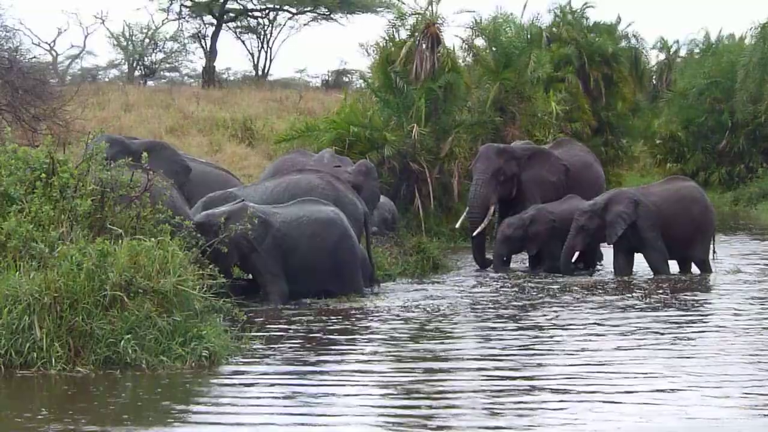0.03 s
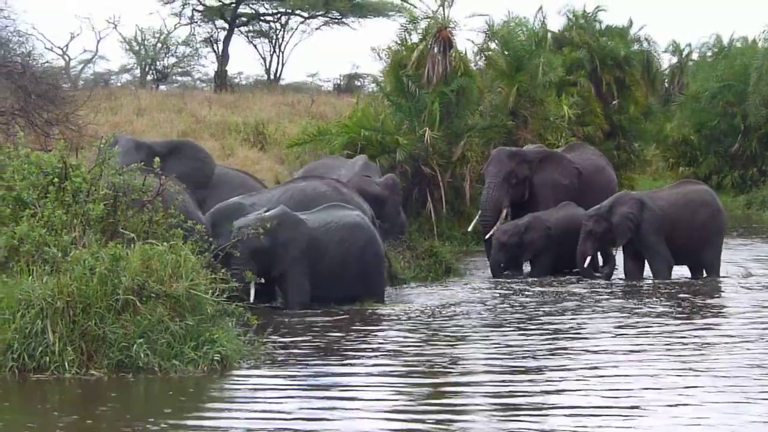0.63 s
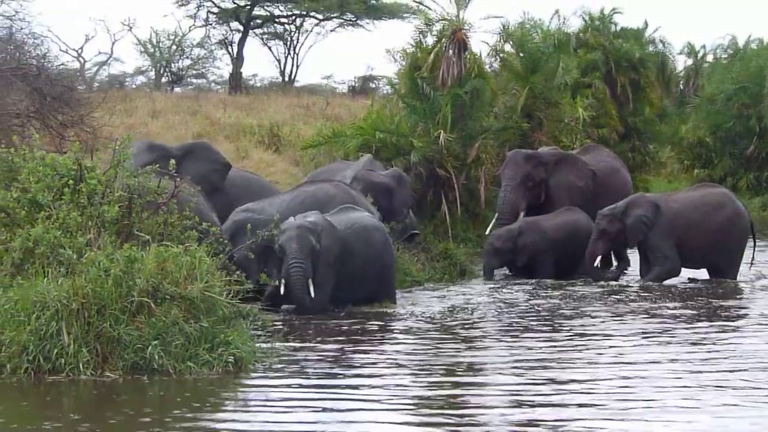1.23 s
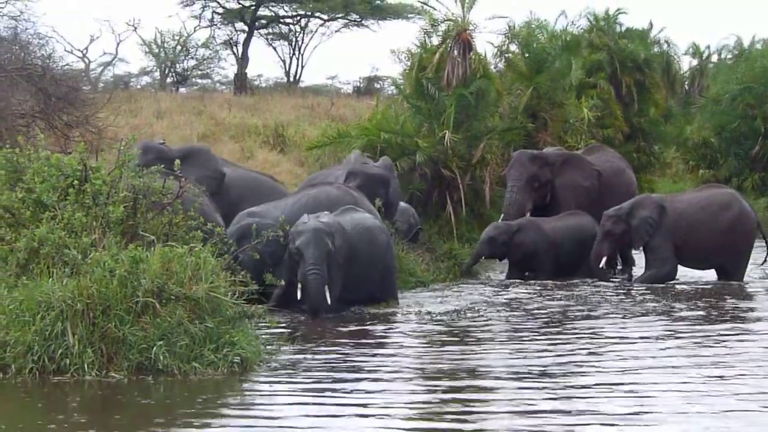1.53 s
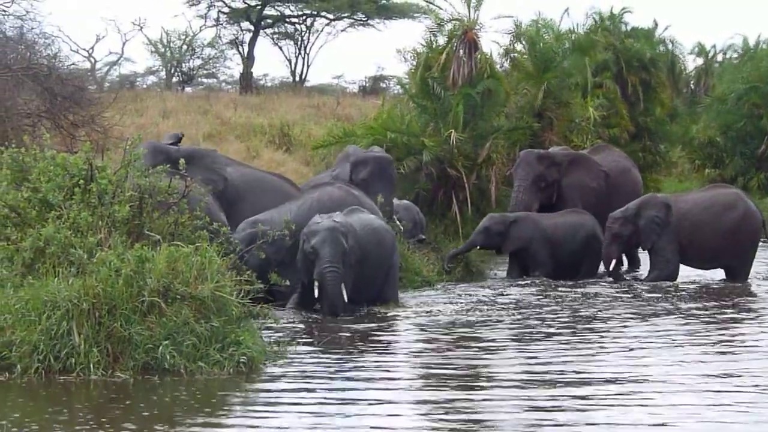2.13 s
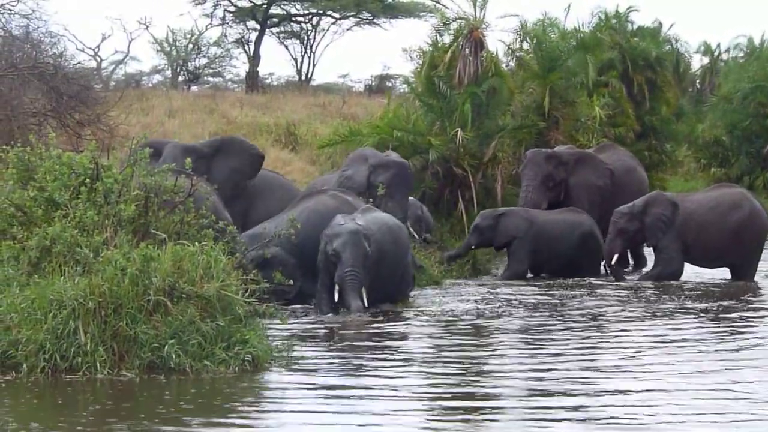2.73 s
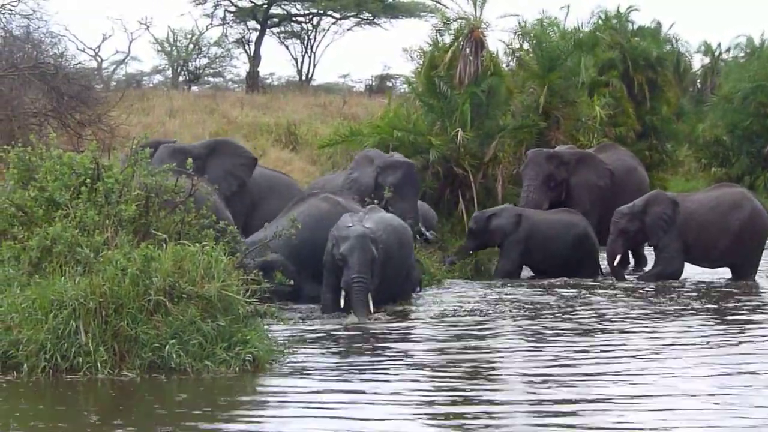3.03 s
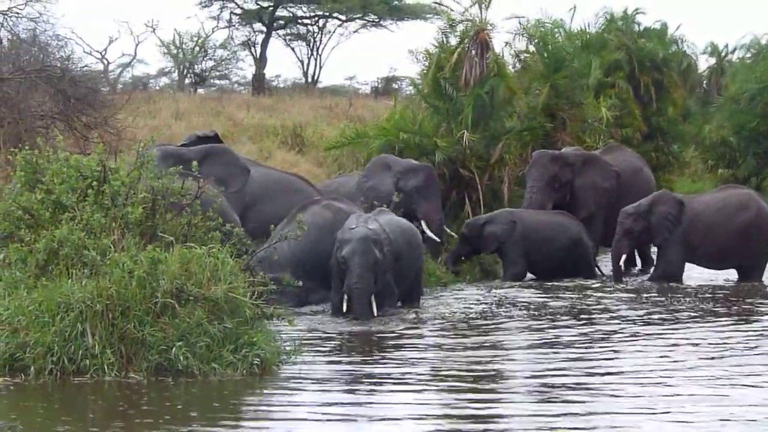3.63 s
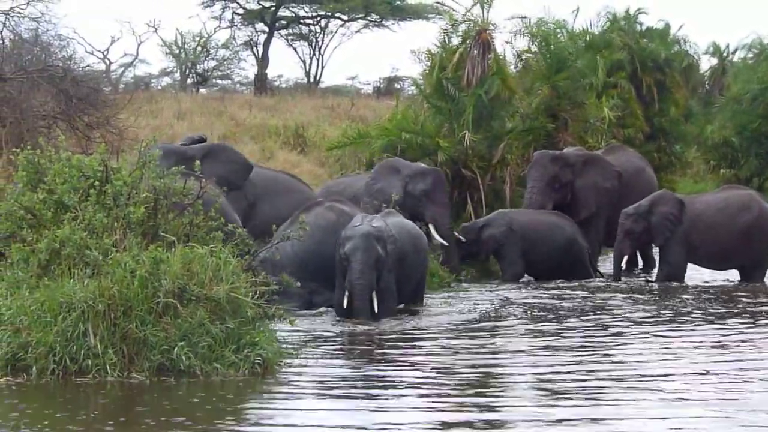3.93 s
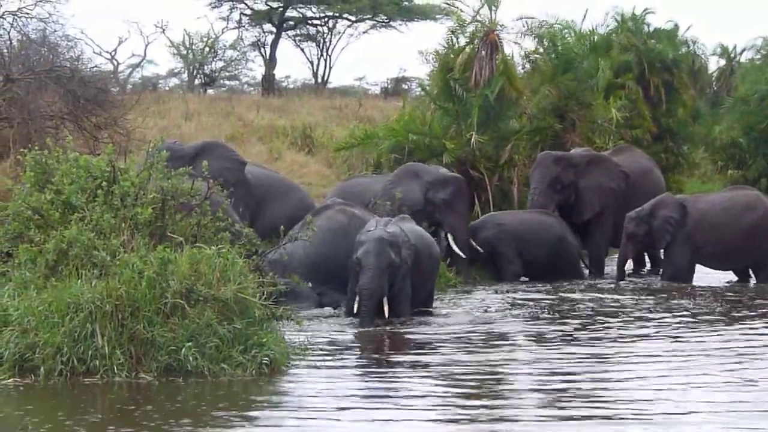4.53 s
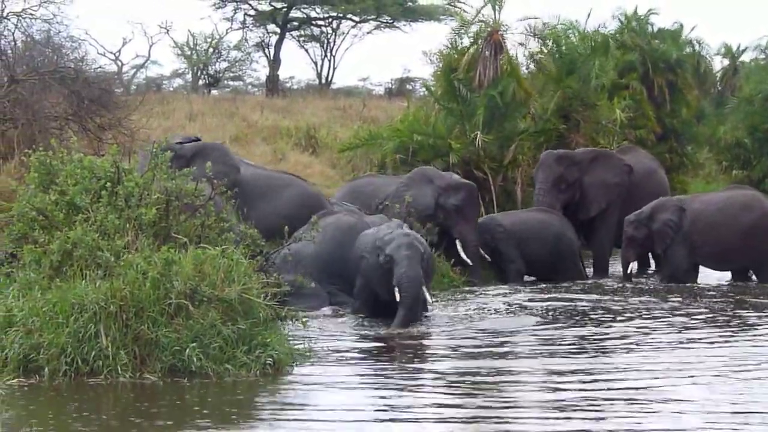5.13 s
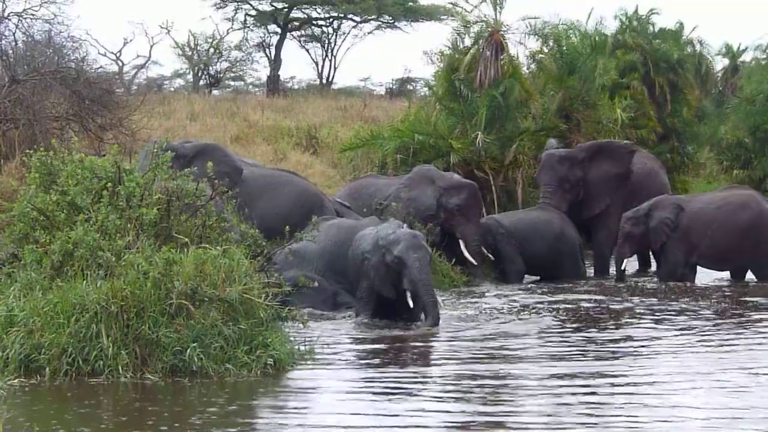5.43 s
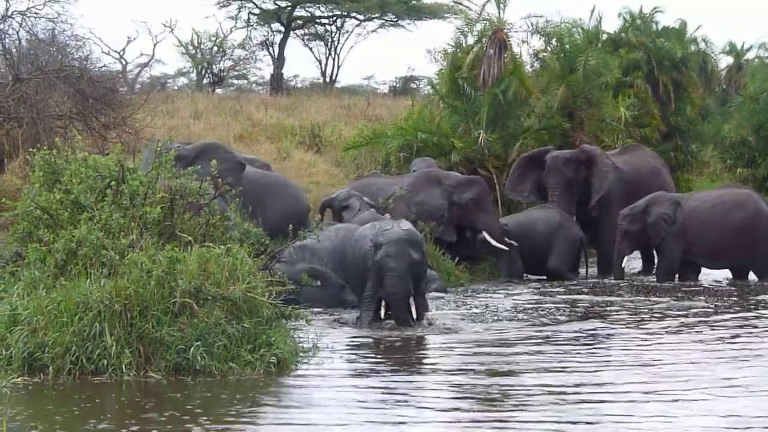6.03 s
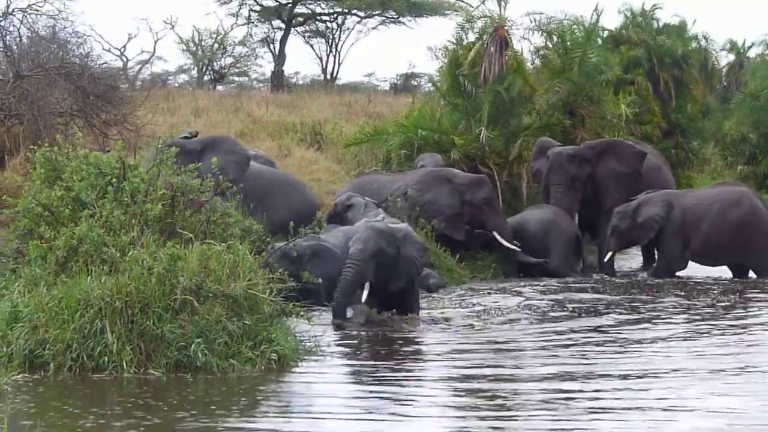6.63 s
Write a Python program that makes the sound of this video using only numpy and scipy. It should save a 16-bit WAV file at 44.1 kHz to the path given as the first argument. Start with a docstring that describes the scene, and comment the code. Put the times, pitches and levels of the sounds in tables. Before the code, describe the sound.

Low wind gusts thump the microphone over a steady river rush, faint splashing from wading elephants and one thin bird whistle.

```python
"""Elephants wading in a river

Some way off, elephants stir up bubbles that slosh and plop, and throw spray that spatters.
Water and windblown leaves make a steady rush, and a small bird gives one thin, high whistle.
Gusts buffet the microphone's two openings (ports); a gain control ducks the sound after hard ones."""
import sys
import numpy as np
from scipy import signal
from scipy.fft import rfft, irfft
from scipy.io import wavfile
from scipy.ndimage import uniform_filter1d

SR = 44100
rng = np.random.default_rng(int(sys.argv[2]) if len(sys.argv) > 2 else 0)


def persist_wave(psi):
    """Save psi, clipped to +-1, as 16-bit WAV."""
    counts = np.round(np.clip(psi, -1, 1) * 32767).astype(np.int16)
    wavfile.write(sys.argv[1], SR, np.atleast_2d(counts).T)


N = 303408
T = np.arange(N) / SR
BINS = np.fft.rfftfreq(N, 1 / SR)

# Levels in the tables are relative: the functions set the final loudness.
# tone colour of the rush of water and leaves: f/Hz, level/dB
RUSH_SPECTRUM = [(20, -38), (45, -8.5), (90, -9.5), (125, -7), (230, -4), (400, 1), (650, -1), (790, -4),
                 (1100, -7), (1400, -6.5), (2300, -8.5), (3200, -11), (5500, -12.5), (6900, -16),
                 (7500, -28.5), (8000, -63.5)]
# humps and hollows in that colour: f/Hz, width/Hz, change/dB
RUSH_HUMPS = [(115, 18, 11), (423, 45, -1), (475, 24, -2.5), (603, 100, 3), (870, 55, -1), (1016, 188, 5.5),
              (2577, 170, 4.5), (2670, 350, -4)]
# how alike the rush is at the two ports: f/Hz, likeness/0-1
RUSH_LIKENESS = [(40, 0.94), (130, 0.99), (300, 1), (650, 0.98), (1050, 1), (1400, 0.59), (1900, 0.56),
                 (2700, 0.22), (3400, .15), (4500, 0.34), (6500, 0.67), (8000, 0.63)]
# how much louder it is on the left: f/Hz, difference/dB
RUSH_LEFT_BOOST = [(60, 1), (230, 0), (400, 1.5), (560, 0.5), (870, 3), (1360, 5.5), (2200, 5.5),
                   (3300, 2.5), (5200, 4), (7800, -3)]
# how far its waves are ahead on the left: f/Hz, phase/rad
RUSH_LEFT_LEAD = [(100, .03), (600, 0.083), (1000, 0.43), (2000, 0.9), (2800, 1.3), (4200, 0.58),
                  (6500, 0.83), (8000, .2)]
# the breeze in the leaves swells and slackens: t/s, half length/s, change/dB
BREEZE_SWELLS = [(0.135, 0.19, 2.5), (0.999, 0.48, -1.5), (1.55, 0.15, 0.9), (2.6, 0.1, 1),
                 (3.417, 0.72, -1.4), (4.216, 0.15, 1.5), (4.798, 0.98, 0.06), (6.537, 0.044, 0.8)]
# rumble of wind on the microphone: f/Hz, level/dB
RUMBLE_SPECTRUM = [(15, -42.5), (30, -15.5), (55, -2.5), (110, 2.5), (180, 0.5), (250, -4.5), (350, -11),
                   (480, -18), (700, -26.5), (1100, -41.5), (2500, -54.5), (6000, -73)]
# a small, fast eddy (a whirl of air) sounds higher: f/Hz, level/dB
SHARP_SPECTRUM = [(30, -20), (130, 0), (290, -0.5), (480, -6.5), (700, -11), (1100, -25.5), (2500, -54.5),
                  (6000, -72)]
# gusts on the microphone: start/s, length/s, level/dB
WIND_GUSTS = [(0.281, 0.08, -28.5), (0.444, 0.16, -29.5), (0.726, 0.11, -26), (0.849, 0.21, -25),
              (1.028, 0.06, -27.5), (1.364, 0.13, -41), (1.825, 0.19, -30.5), (2.12, 0.09, -26.5),
              (2.252, 0.11, -28), (2.668, .1, -34.5), (2.83, 0.075, -20), (2.945, 0.17, -26.5),
              (3.142, 0.12, -35), (3.43, 0.28, -40.5), (6.036, 0.12, -31.5), (6.23, 0.07, -31.5),
              (6.335, 0.035, -33.5), (6.536, 0.054, -31.5), (6.755, .2, -29)]
# the hardest eddies: t/s, level/dB, half length/s, sharpness/0-1
EDDIES = [(.277, -27.5, 0.014, 0.06), (0.343, -19, 0.017, 0.1), (0.377, -18.5, .008, 0.07),
          (0.447, -13, 0.008, .1), (0.473, -15, .011, 0.4), (0.524, -15.5, 0.013, .4),
          (.567, -16, 0.0097, 0.08), (0.743, -18.5, 0.0066, .15), (0.785, -18.5, .009, 0),
          (0.848, -13, 0.01, 0.35), (0.868, -17, .006, 0.4), (.921, -14.5, 0.011, .15),
          (0.975, -16.5, .006, 0.8), (1.009, -16, 0.025, 1), (1.857, -35, .01, 0.2),
          (1.922, -24.5, 0.012, 0.2), (1.983, -23, 0.0068, .3), (2.028, -25.5, 0.0085, .3),
          (2.094, -19, 0.0058, 0), (2.136, -19, 0.012, 0.7), (2.167, -14.5, 0.012, 0.6),
          (2.21, -21.5, .008, .5), (2.26, -18.5, 0.016, 0.4), (2.322, -18.5, .011, 0.5),
          (2.389, -24.5, 0.011, .1), (2.63, -27.5, 0.0071, .5), (2.809, -22, 0.0061, 0),
          (2.825, -14, 0.0064, .05), (2.901, -23, .01, 0.1), (2.922, -13.5, 0.0071, 0),
          (2.948, -17, 0.0076, 0.07), (2.962, -22.5, 0.0081, .1), (2.996, -18, 0.0087, .15),
          (3.043, -16.5, 0.008, 0.5), (3.113, -26, 0.0071, 0), (3.194, -32.5, .006, 0.4),
          (3.444, -25, .008, 0.3), (3.585, -25.5, 0.0091, 0), (5.478, -31.5, 0.013, .5),
          (5.702, -31, 0.02, 0.6), (6.024, -19, 0.01, 0), (6.1, -24, 0.0081, 1), (6.143, -23, .007, .3),
          (6.261, -20, .017, 0.1), (6.298, -22.5, .008, 0.1), (6.346, -25.5, .008, .1),
          (6.397, -27, .008, 0.1), (6.516, -19, 0.0065, 0.2), (6.534, -19.5, .006, 0.6),
          (6.567, -20.5, .008, .2), (6.755, -16, 0.014, .3), (6.776, -22.5, .009, .3),
          (6.874, -16.5, 0.031, 1)]
# whirls of air that hit the ports head on: t/s, level/dB, f/Hz
WIND_THUMPS = [(.327, -6.5, 200), (.8465, -3, 180), (2.1525, -3, 260), (2.319, -10, 230), (6.738, -11, 130)]
# the larger spatters of spray: t/s, level/dB, half length/s, f/Hz
SPRAY_BURSTS = [(0.09, -34, .003, 5000), (.128, -34, .003, 5000), (.192, -31, .004, 5800),
                (0.247, -32, .009, 2500), (.286, -26.5, 0.0034, 2530), (1.523, -29.5, 0.0054, 4500),
                (1.642, -32, 0.0026, 3050), (1.838, -32, .004, 2320), (3.124, -31.5, 0.0021, 4900),
                (3.198, -29.5, 0.0022, 2410), (4.174, -32, 0.0027, 5000), (5.486, -31, .003, 4650),
                (6.007, -34, .003, 2570), (6.42, -36, .004, 2500), (6.427, -28, .002, 2800),
                (6.462, -31.5, 0.0066, 6000), (6.61, -32, 0.0027, 4700), (6.6296, -23, 0.0013, 4200)]
# water closes over feet and trunks: t/s, level/dB, f/Hz
AIR_POCKETS = [(.183, -17, 558), (.247, -16.5, 683), (1.161, -19.5, 1160), (1.252, -20, 1134),
               (1.474, -19, 940), (2.08, -22, 1290), (2.418, -15.5, 880), (2.67, -18.5, 1090),
               (3.817, -19.5, 800), (3.991, -18.5, 426), (4.038, -17.5, 590), (4.39, -18.5, 431),
               (4.476, -20, 610), (4.563, -21, 830), (4.912, -19, 934), (4.916, -19, 620),
               (5.42, -20.5, 432), (5.532, -20, 614), (5.6, -23, 573), (5.892, -17, 431),
               (6.018, -17.5, 705), (6.261, -14, 666), (6.583, -16.5, 1000)]
# legs and trunks stir the water: t/s, half length/s, level/dB, f/Hz
STIRRINGS = [(.01, 0.037, -26, 850), (0.25, 0.066, -33, 1100), (.642, 0.047, -36, 850),
             (1.164, 0.077, -36, 1100), (2.004, .08, -34, 750), (2.4, 0.042, -35, 800),
             (3.07, 0.028, -26, 650), (3.83, 0.035, -32, 750), (4.205, 0.052, -32, 1290),
             (4.648, 0.14, -43, 1200), (4.983, .08, -35.5, 1200), (5.303, .06, -33, 900),
             (5.6, 0.094, -39, 850), (6.014, .035, -32, 900), (6.265, .05, -36, 850),
             (6.52, 0.074, -43, 1100)]


def gain_of(db):
    """Turns decibels into a factor to multiply a sound by."""
    return 10 ** (np.asarray(db) / 20)


def evened(x):
    """Scales a signal to an average strength (rms) of 1."""
    return x / np.sqrt(np.mean(x ** 2) + 1e-20)


def read(points, hz):
    """Reads between the points of a curve, with octaves evenly spaced."""
    f, value = np.transpose(points)
    return np.interp(np.log(hz + 1), np.log(f + 1), value)


def coloured(x, points):
    """Filters a sound by a curve of points: f/Hz, level/dB."""
    return irfft(rfft(x) * gain_of(read(points, BINS)), N)


def smoothed(x, seconds):
    """A bell-shaped running average."""
    offset = np.arange(-4000, 4001) / SR
    window = np.exp(-.5 * (offset / seconds) ** 2)
    return signal.fftconvolve(x, window / window.sum(), "same")


def wander(rate_hz):
    """A random drift of strength 1, mostly slower than the rate."""
    return evened(irfft(rfft(rng.standard_normal(N)) * np.exp(-(BINS / rate_hz) ** 2), N))


def bell(s, half):
    """A smooth rise and fall of height 1 around time s."""
    return np.exp(-np.minimum(((T - s) / half) ** 2, 60))


def add(mix, s, sound):
    """Mixes a sound in at time s."""
    part = mix[max(round(s * SR), 0):][:len(sound)]
    part += sound[:len(part)]


def breeze(steady_db=2.5):
    """The changing strength of the breeze in the leaves, in dB."""
    return steady_db + sum(db * bell(s, half) for s, half, db in BREEZE_SWELLS)


def rush(level_db=-29.5, patch_db=0.92, flicker_db=1.36, leaves_from_hz=700):
    """Far water and leaves: noise with drifting louder patches, whose treble follows the breeze."""
    frames, hz = N // 256 + 5, np.fft.rfftfreq(1024, 1 / SR)  # a grid of moments and pitches
    t = np.arange(frames) * 256 / SR
    a, b, c, d, patches = rng.standard_normal((5, frames, len(hz)))
    common, separate = a + 1j * b, c + 1j * d
    patches = uniform_filter1d(patches, size=7, axis=0)  # blur over time
    patches = evened(uniform_filter1d(patches, size=14, axis=1))  # and over pitch
    likeness = np.clip(read(RUSH_LIKENESS, hz), 0, 1)
    lag = np.exp(-1j * read(RUSH_LEFT_LEAD, hz))
    left = common * gain_of(read(RUSH_LEFT_BOOST, hz))
    right = (likeness * common + np.sqrt(1 - likeness ** 2) * separate) * lag
    ports = np.array([left, right]) / np.sqrt(np.mean(abs(left + right) ** 2, axis=0))
    leaves = hz ** 2 / (hz ** 2 + leaves_from_hz ** 2)
    breeze_db = np.interp(t, T, breeze() + flicker_db * wander(rate_hz=200))
    ports = ports * gain_of(patch_db * patches + breeze_db[:, None] * leaves)
    noise = signal.istft(ports.swapaxes(1, 2), nperseg=1024, noverlap=768)[1][:, :N]  # grid to sound
    humps_db = sum(db / (1 + (2 * (BINS - f) / width) ** 2) for f, width, db in RUSH_HUMPS)
    noise = irfft(rfft(noise) * gain_of(read(RUSH_SPECTRUM, BINS) + humps_db), N)
    return gain_of(level_db) * noise / noise.mean(0).std()


def bubble(hz, ring_s, rise=0.0095):
    """A pocket of air rings briefly, its pitch rising as it nears the surface."""
    t = np.arange(0, 7 * ring_s, 1 / SR)
    age = t / ring_s
    return 2 * age * np.exp(-age) * np.sin(2 * np.pi * hz * t * (1 + rise * (age / 2 - 1)))


def ripples(level_db=-42, per_s=400, spread_db=8.5, cycles=1.97, right_db=-4, count=28):
    """Many small bubbles and droplets patter inside the rush."""
    out = np.zeros((2, N))
    for hz in np.geomspace(500, 6500, count):
        strength = gain_of(spread_db * np.minimum(rng.exponential(1, N), 4))
        starts = rng.random(N) < per_s / count / SR
        drops = signal.oaconvolve(strength * starts, bubble(hz, cycles / hz))[:N]
        delay = rng.integers(-2, 6)  # each pitch reaches the right port at its own time
        out += [drops, gain_of(right_db) * np.roll(drops, delay)]
    return gain_of(level_db) * evened(coloured(out, [(6800, -3), (8000, -28)]))


def bird(start_s=5.35, length_s=0.325, hz=8720, sag_hz=150, waver_hz=48, level_db=-34.5, fade_db=-10):
    """One arched, quivering whistle; it flutters because it takes many paths through the trees."""
    from_middle = np.clip(2 * (T - start_s) / length_s - 1, -2, 2)
    droop = from_middle ** 4
    pitch = hz - sag_hz * np.minimum(droop, 1) + waver_hz * wander(rate_hz=94)
    whistle = gain_of(level_db + fade_db * droop) * np.sin(2 * np.pi * np.cumsum(pitch) / SR)
    delays_s = 0.02 * rng.exponential(1, (2, 40))  # 40 paths to each port
    ports = np.array([sum(np.roll(whistle, round(s * SR)) for s in paths) for paths in delays_s])
    return ports * whistle.std() / ports.std(axis=1, keepdims=True)


def turbulence(spectrum):
    """Churning air: rumbling noise of nearly even strength."""
    noise = evened(coloured(rng.standard_normal(N), spectrum))
    return noise / np.sqrt(smoothed(noise ** 2, seconds=0.007) + .03)


def swirl(spectrum, shared, crossing_s=0.00055):
    """Churning air at both ports: the shared part reaches the left one first."""
    common, left, right = (turbulence(spectrum) for _ in range(3))
    both = np.array([common, np.interp(T - crossing_s, T, common)])
    return np.sqrt(shared) * both + np.sqrt(1 - shared) * np.array([left, right])


def gusts(rise_s=0.035, fall_s=0.037, stir_db=-11.5, stir_s=0.12):
    """Each gust arrives quickly, holds and dies away, with weakly stirred air around it."""
    power = np.zeros(N)
    for start, length, db in WIND_GUSTS:
        early, late = np.maximum(start - T, 0), np.maximum(T - start - length, 0)
        blast = np.exp(-early / rise_s - late / fall_s)
        stir = gain_of(stir_db) * np.exp(-(early + late) / stir_s)
        power = np.maximum(power, gain_of(db) ** 2 * (blast ** 2 + stir ** 2))
    return np.sqrt(power)


def wind(steady_db=1.5, lumpy_db=4, flutter_db=3.5, limit_db=4, left_db=2.2, right_db=1):
    """Gusts and single eddies push on the microphone; sharp eddies sound higher."""
    unrest_db = np.array([lumpy_db * wander(rate_hz=30) + flutter_db * wander(rate_hz=74)
                          for _ in range(2)])
    unrest_db = limit_db * np.tanh(unrest_db / limit_db)
    low_power = (gusts() * gain_of(steady_db + unrest_db)) ** 2
    high_power = np.zeros(N)
    for s, db, half, sharpness in EDDIES:
        power = gain_of(db) ** 2 * bell(s, half)
        low_power += power * (1 - sharpness)
        high_power += power * sharpness
    rumble = np.sqrt(low_power) * swirl(RUMBLE_SPECTRUM, shared=0.2)
    buffets = np.sqrt(high_power) * swirl(SHARP_SPECTRUM, shared=0.77)
    left, right = rumble + buffets
    sheltered = coloured(right, [(30, 7), (100, -2), (300, -3), (900, -2)])  # duller out of the wind
    return np.array([gain_of(left_db) * left, gain_of(right_db) * sheltered])


def thumps(half_cycles=0.56, left_db=1, right_db=-4, crossing_s=0.0005):
    """A whirl of air hits head on: one or two quick swings of pressure, the left port first."""
    t = np.arange(-1024, 1024) / SR
    out = np.zeros(N)
    for (s, db, hz), turn in zip(WIND_THUMPS, rng.random(len(WIND_THUMPS))):
        swing = np.exp(-(t * hz / half_cycles) ** 2) * np.sin(2 * np.pi * (hz * t + turn))
        add(out, s + t[0], gain_of(db) * swing)
    delayed = np.interp(T - crossing_s, T, out)
    return np.array([gain_of(left_db) * out, gain_of(right_db) * delayed])


def spatter(half, hz, octaves=0.39):
    """A splash of fine drops: a short hiss around one pitch."""
    t = np.arange(-2048, 2048) / SR
    bins = np.fft.rfftfreq(len(t), 1 / SR)
    colour = np.exp(-.5 * (np.log2((bins + 1) / hz) / octaves) ** 2)
    shape = 1 / (1 + (t / half) ** 2)
    burst = irfft(rfft(shape * rng.standard_normal(len(t))) * colour)
    return evened(burst) * np.sqrt(np.mean(shape ** 2))


def spray(gain_db=0.5, right_db=-4, stray_db=-35, stray_half_s=0.0019, low_hz=2000, high_hz=5500):
    """Thrown spray lands in short crisp bursts, stray drops in faint ticks at random."""
    strays = [(when * N / SR, stray_db, stray_half_s, low_hz * (high_hz / low_hz) ** height)
              for when, height in rng.random((18, 2))]
    out = np.zeros(N)
    for s, db, half, hz in SPRAY_BURSTS + strays:
        burst = spatter(half, hz)
        add(out, s - len(burst) / 2 / SR, gain_of(db) * burst)
    out = coloured(out, [(6300, 0), (7200, -14.5), (8000, -42)])
    return gain_of(gain_db) * np.array([out, gain_of(right_db) * np.roll(out, 1)])


def plops(gain_db=-4, right_db=-2, cycles=3.4, faint_db=-30, low_hz=410, high_hz=1100, count=16):
    """Large pockets of air ring around the wading animals, with fainter ones at random."""
    faint = [(when * N / SR, faint_db, low_hz * (high_hz / low_hz) ** height)
             for when, height in rng.random((count, 2))]
    out = np.zeros(N)
    for s, db, hz in AIR_POCKETS + faint:
        add(out, s, gain_of(db) * bubble(hz, cycles / hz))
    return gain_of(gain_db) * np.array([out, gain_of(right_db) * out])


def sloshes(per_s=900, cycles=3.2, octaves=0.64, right_db=-3, count=14):
    """Each stir of a leg or trunk lets go a crowd of middle-sized bubbles around one pitch."""
    out = np.zeros(N)
    pitches = np.geomspace(420, 2400, count)
    shares = np.array([np.exp(-(np.log2(pitches / hz) / octaves) ** 2 / 2) for *_, hz in STIRRINGS])
    stir_power = np.array([(gain_of(db) * bell(s, half)) ** 2 for s, half, db, _ in STIRRINGS])
    for hz, share in zip(pitches, shares.T / shares.sum(axis=1)):  # this pitch's part of each stir
        kicks = rng.standard_normal(N) * (rng.random(N) < per_s / count / SR)
        crowd = evened(signal.oaconvolve(kicks, bubble(hz, cycles / hz))[:N])
        out += np.sqrt(share @ stir_power) * crowd
    return out * gain_of([[0], [right_db]])


def scene():
    """The river bank as it reaches the two ports."""
    return rush() + wind() + thumps() + sloshes() + plops() + ripples() + spray() + bird()


def gain_control(x, threshold_db=-20, slope=0.57, recovery_db_per_s=27, lag_s=0.008):
    """Loud buffets quickly turn the volume down; it then creeps back."""
    power = smoothed((x ** 2).mean(0), seconds=0.0024)
    power_db = 10 * np.log10(abs(power) + 1e-12)
    excess_db = slope * np.maximum(power_db - threshold_db, 0)
    recovered_db = recovery_db_per_s * T
    duck_db = np.maximum.accumulate(excess_db + recovered_db) - recovered_db
    return x * gain_of(-np.interp(T - lag_s, T, duck_db))


def record(dry):
    """Gain control, then a low sampling rate that mirrors the top treble, then a treble cut."""
    sampling_hz, cutoff_hz = 16000, 8830
    ducked = gain_control(dry)
    # each pitch f gains a twin at sampling_hz - f, so the whistle is mostly heard lower
    mirrored = ducked * (1 + 2 * np.cos(2 * np.pi * sampling_hz * T))
    shaped = coloured(mirrored, [(7200, -2.5), (7900, 11.5), (8700, -28)])
    treble_cut = signal.firwin(1023, cutoff_hz, window=("kaiser", 9), fs=SR)
    return signal.oaconvolve(shaped, treble_cut[None], "same")


dry = scene()
out = record(dry)
persist_wave(out)
```